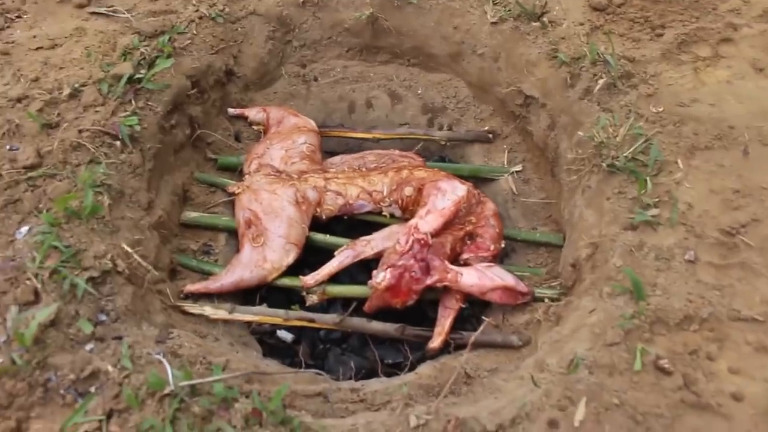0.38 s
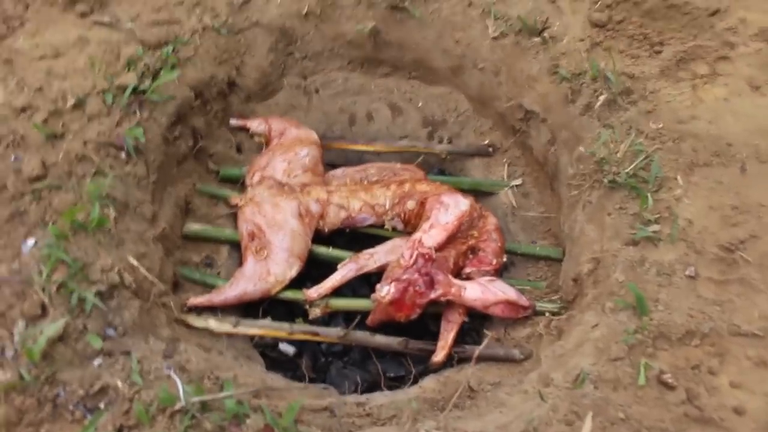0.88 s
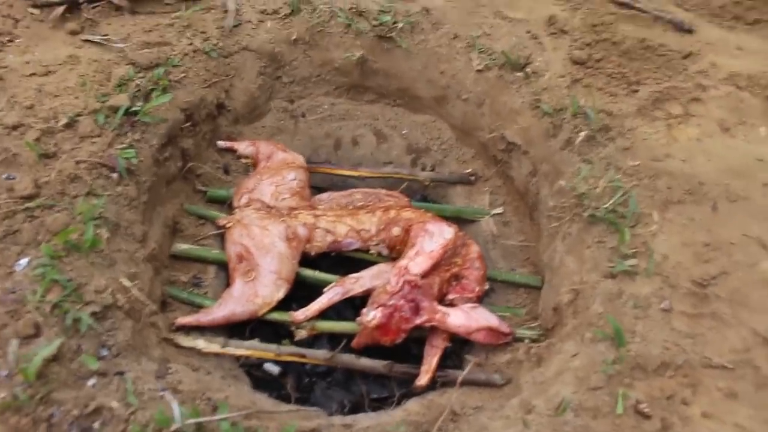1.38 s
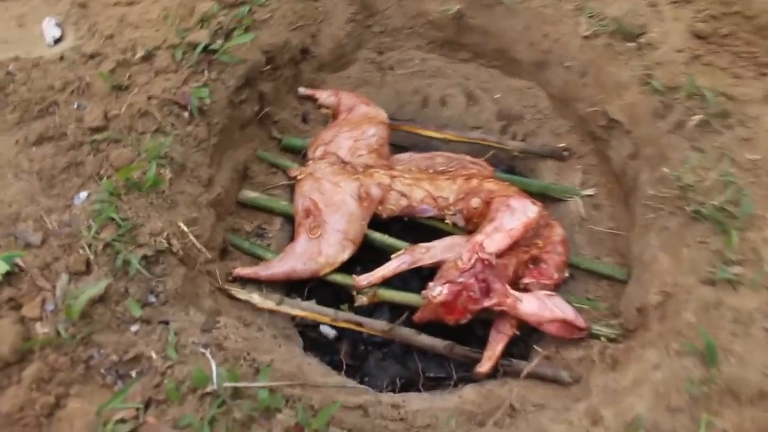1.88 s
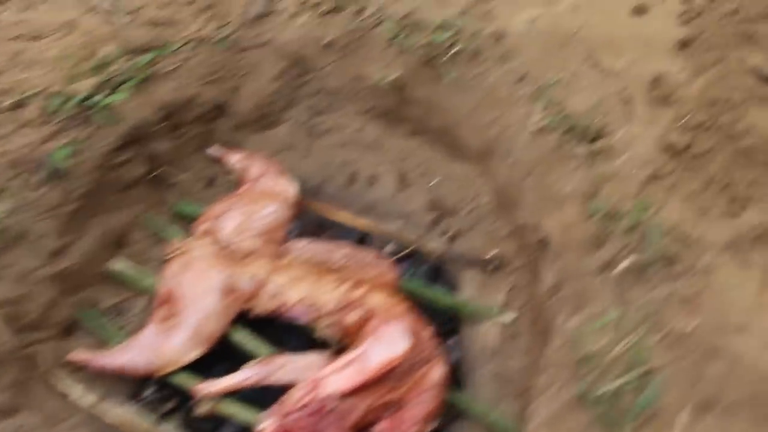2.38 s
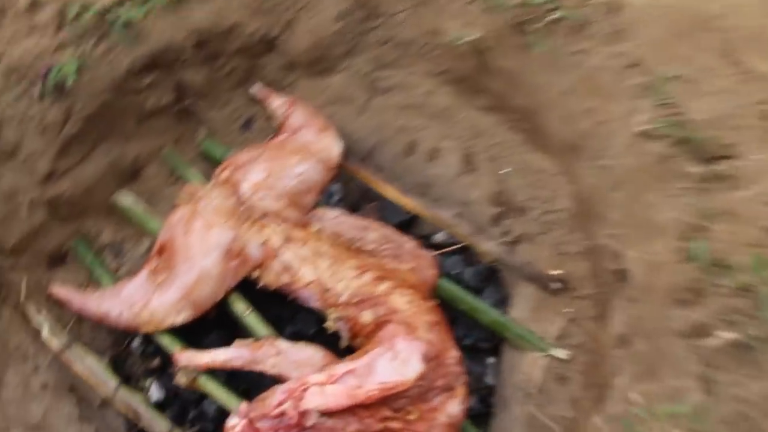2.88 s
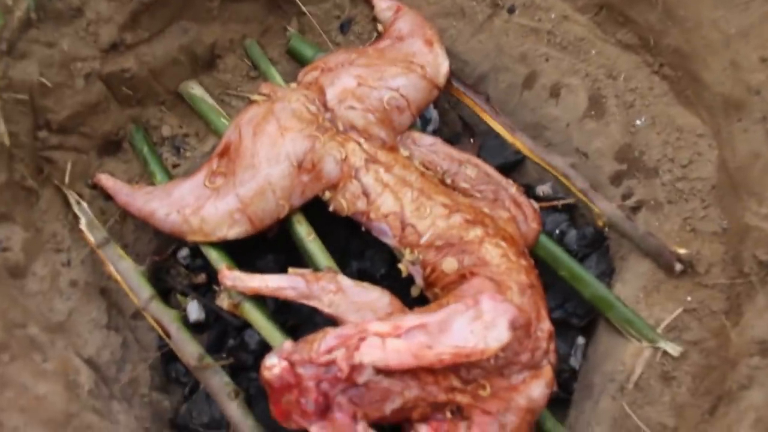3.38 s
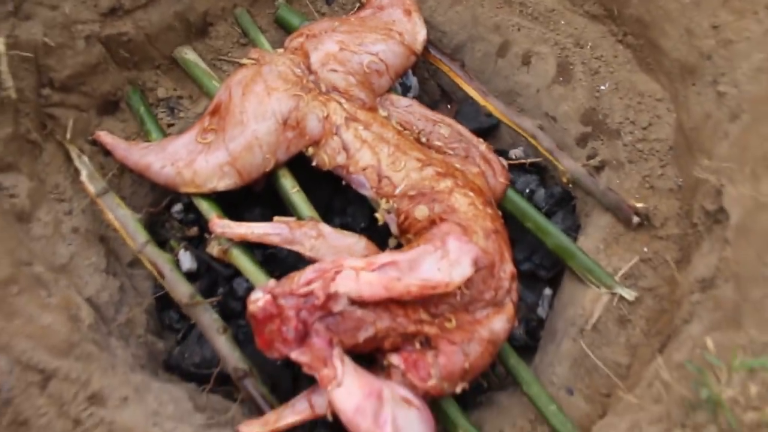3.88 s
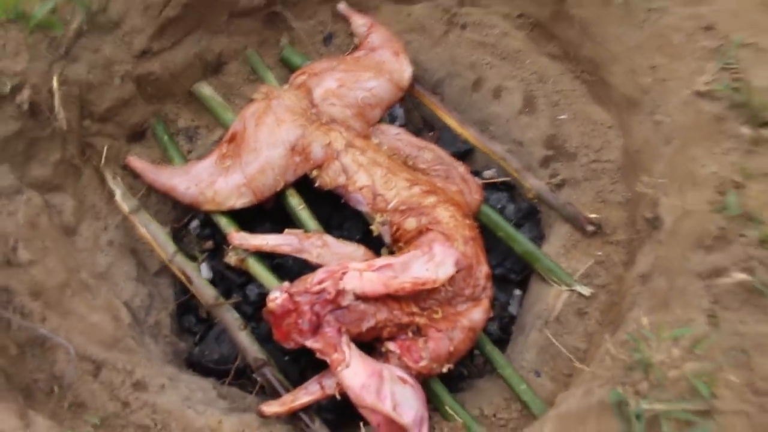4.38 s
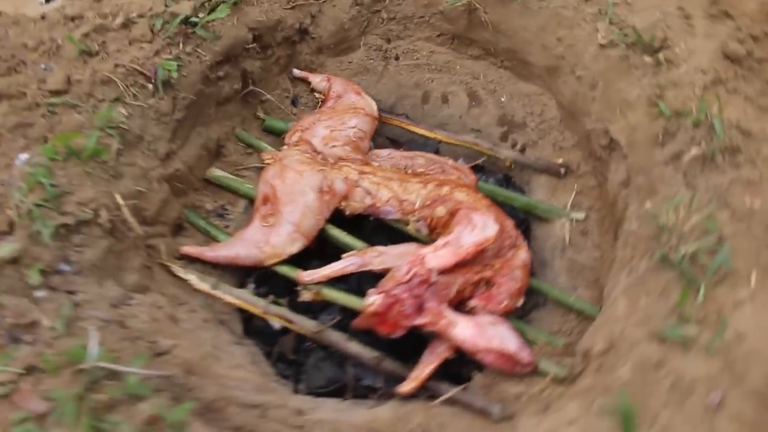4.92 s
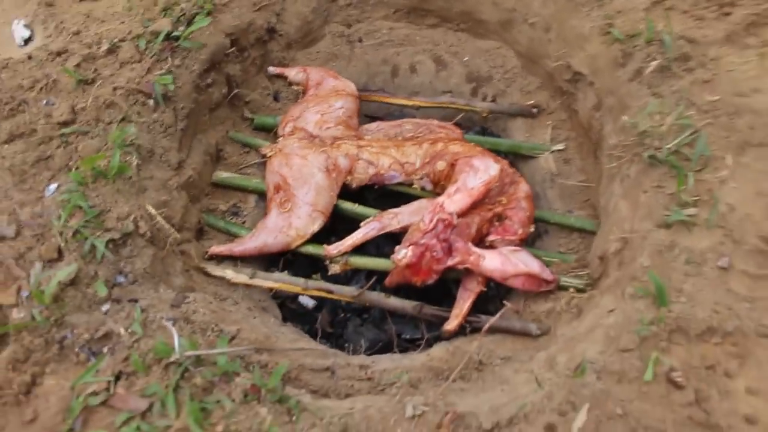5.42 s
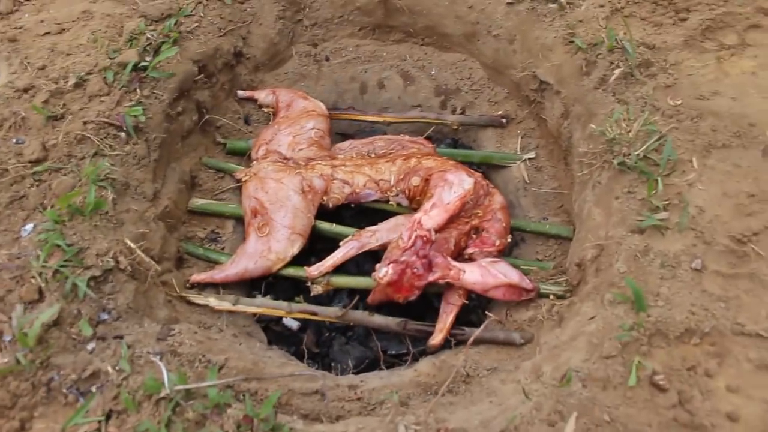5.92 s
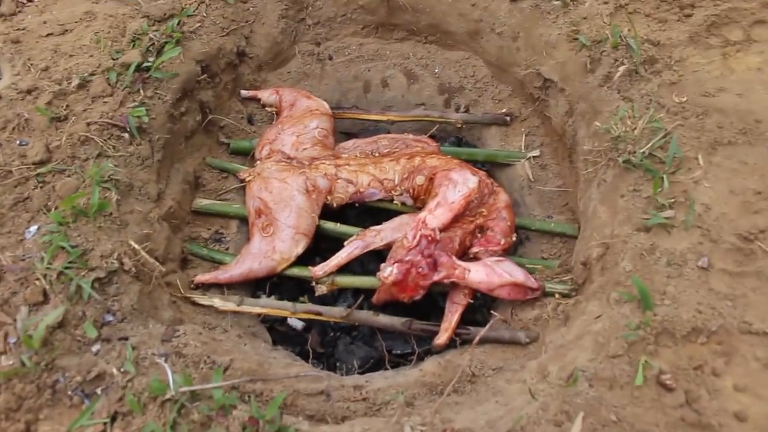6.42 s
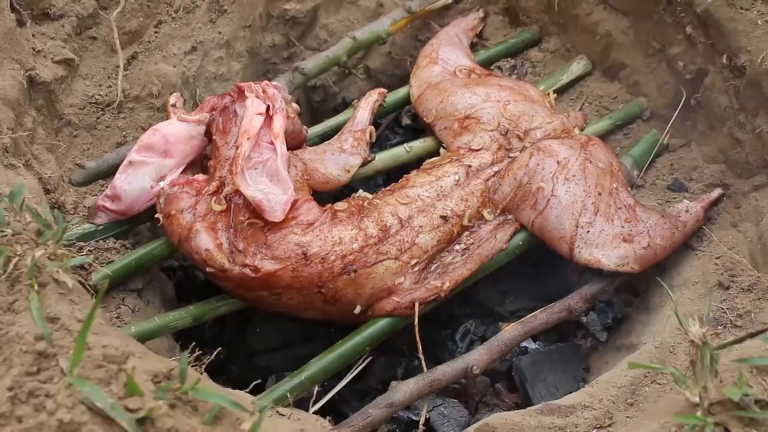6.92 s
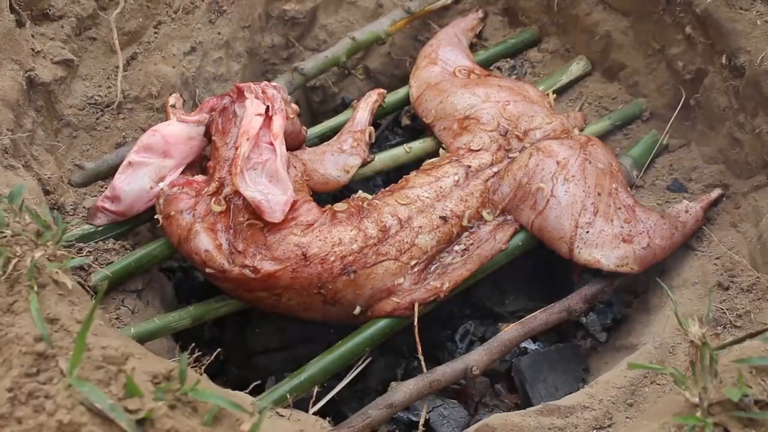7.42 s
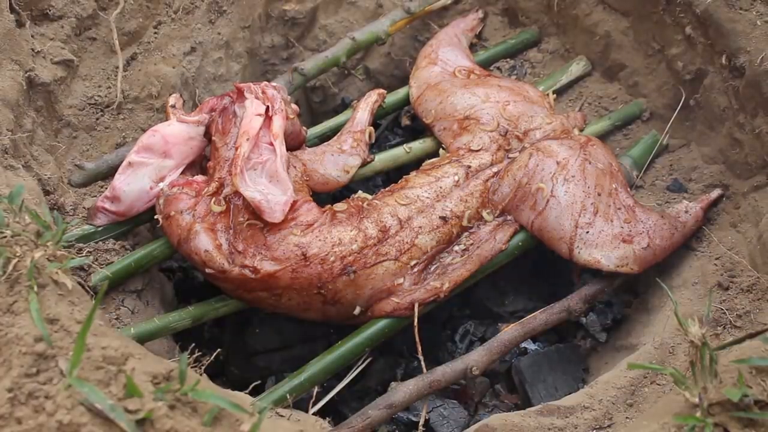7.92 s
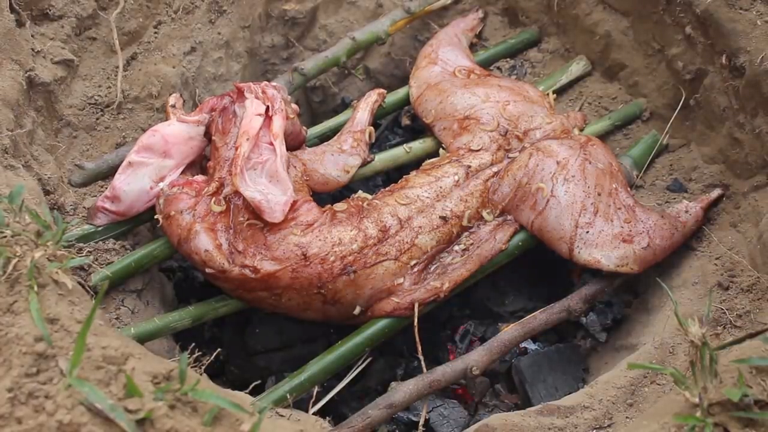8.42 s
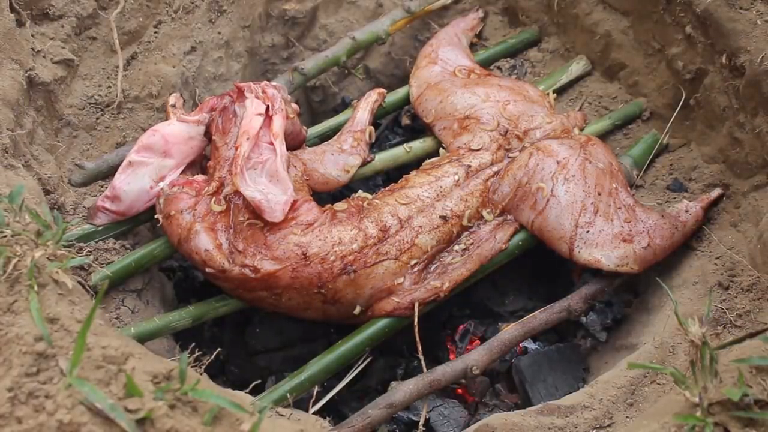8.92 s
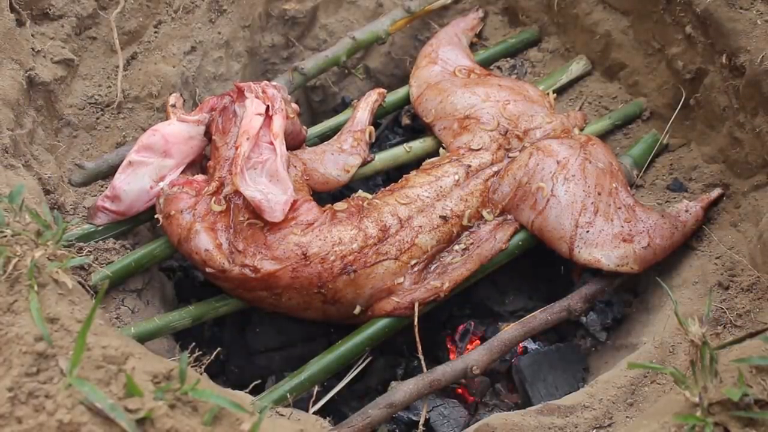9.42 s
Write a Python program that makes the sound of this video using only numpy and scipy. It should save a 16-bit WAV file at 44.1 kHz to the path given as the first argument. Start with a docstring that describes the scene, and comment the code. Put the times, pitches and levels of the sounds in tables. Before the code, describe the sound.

Outdoors by a cooking pit in soil, a soft forest hiss and high throbbing cricket drone continue, with nearby cricket trills and small falling bird chirps. Feet slide on sand, twigs and embers tick lightly. Around seven seconds a twig cracks sharply with a close scuff, a gritty drag follows, bird calls become livelier, and a draught makes the fire flutter low. Wide stereo pair near the ground.

```python
"""Forest hiss, far rumble and a throbbing cricket chorus surround a cooking pit; all are filtered noise.
Birds and soft low animal calls are falling sine whistles with scattered echoes; near crickets trill in wing strokes.
Feet rub sandy soil as clumped noise; embers and twigs tick and soil bumps ring as decaying resonances.
One twig cracks under a close scuff, and at the end a draught makes the fire roar.
Level and delay differences between the two channels act as a pair of spaced microphones."""
import sys
import numpy as np
from scipy import signal
from scipy.fft import rfft, irfft, next_fast_len
from scipy.io import wavfile
from scipy.ndimage import map_coordinates

SR = 44100
rng = np.random.default_rng(int(sys.argv[2]) if len(sys.argv) > 2 else 0)


def attenuation_scalar(level_db):
    """Turn a level in dB into a linear amplitude multiplier (20 dB per decade)."""
    decades = np.asarray(level_db, float) / 20
    return 10 ** decades


def pcm_store(signal):
    """Save signal as 16-bit PCM."""
    levels = np.round(np.clip(np.atleast_2d(signal), -1, 1) * 32767)
    wavfile.write(sys.argv[1], SR, levels.astype(np.int16).T)


N = 421155

# Relative spectrum of fine grains under a close sole: frequency_hz, level_db
FINE_SAND = [(3240, -16), (5500, -14), (8040, -11.5), (11900, -20), (14900, -28), (15800, -52)]


def unit(x):
    """Normalisation: divides a signal by its root-mean-square value."""
    return x / np.sqrt(np.mean(x ** 2) + 1e-20)


def along(points, hz):
    """Logarithmic frequency scale: interpolates rows of frequency and value."""
    f, v = np.transpose(points)
    return np.interp(np.log(hz + 1), np.log(f + 1), v)


def curves(rows):
    """Linear envelopes: one value per sample for each column after the time."""
    s, *cols = np.transpose(rows)
    return [np.interp(np.arange(N) / SR, s, c) for c in cols]


def wobble(rate):
    """Band-limited random modulation: a smooth curve through rate random knots a second."""
    knots = rng.standard_normal(int(N * rate / SR) + 4)
    return map_coordinates(knots, [np.arange(N) * rate / SR])


def filtered(x, response):
    """Linear filtering: multiplies the spectrum by a complex response of frequency."""
    m = next_fast_len(N + 8192)
    return irfft(rfft(x, m) * response(np.fft.rfftfreq(m, 1 / SR)), m)[..., :N]


def hiss():
    """White noise: two independent channels with equal power at all frequencies."""
    return rng.standard_normal((2, N))


def pair(noise, spectrum, alike, lag_ms):
    """Interchannel coherence: colours two noises to correlation alike, left one late, overall rms 1."""
    turn = np.arccos(np.clip(alike, -1, 1)) / 2
    common, opposed = np.cos(turn) * noise[0], np.sin(turn) * noise[1]
    lag_s = lag_ms / 1000 * np.array([[1], [0]])

    def response(hz):
        return attenuation_scalar(along(spectrum, hz)) * np.exp(-2j * np.pi * hz * lag_s)

    return unit(filtered(np.array([common + opposed, common - opposed]), response))


def sides(pan_db):
    """Interchannel level difference: left and right gains, positive toward the left."""
    half_db = np.atleast_1d(pan_db) / 2
    return attenuation_scalar(np.array([half_db, -half_db]))


def rumble():
    """Low-frequency noise: a slowly wavering rumble from afar."""
    # Relative spectrum of the rumble: frequency_hz, level_db
    rumble_spectrum = [(15, -46), (25, -41), (43, -1), (91, 1.5), (140, -4.5), (173, -19), (200, -10),
                       (260, -45), (440, -120)]
    level = attenuation_scalar(-58.5 + 1.6 * wobble(2.52) + 1.06 * wobble(6))
    return level * pair(hiss(), rumble_spectrum, alike=0.82, lag_ms=0) * sides(4)


def flames():
    """Amplitude-modulated noise: flames flutter, and the draught sets their level."""
    # Fire and wind level before a fixed gain: time_s, level_db
    draught = [(0, -67), (1.1, -57), (1.65, -61), (2.3, -56.5), (3.3, -64), (4.52, -60.5), (4.9, -62),
               (6.6, -65), (7.15, -53.5), (7.85, -58.5), (8.1, -50), (8.5, -40.5), (9.0, -41.5),
               (9.55, -38)]
    # Relative spectrum of the flames: frequency_hz, level_db
    flame_spectrum = [(35, -35), (60, -9.5), (112, -4.5), (226, -1), (287, -0.5), (466, -16), (686, -15),
                      (900, -23.5), (1170, -23), (1980, -120)]
    level_db, = curves(draught)
    flutter = attenuation_scalar(2.25 * wobble(25))
    flame = unit(flutter * pair(hiss(), flame_spectrum, alike=0.88, lag_ms=0.055))
    return flame * attenuation_scalar(level_db - 3.17) * sides(2.5)


def forest_hiss():
    """Diffuse field: the forest hiss is nearly uncorrelated between the channels."""
    # Relative spectrum of the forest hiss: frequency_hz, level_db
    hiss_spectrum = [(88, -33), (150, 0), (244, -9.5), (455, -6), (727, -11), (1280, -12.5), (2790, -14.5),
                     (3740, -11.5), (4280, -6), (5410, -16.5), (13300, -29.5), (15800, -33.5)]
    level = attenuation_scalar(-52.0 + 0.29 * wobble(2.93))
    return level * pair(hiss(), hiss_spectrum, alike=0.083, lag_ms=0.212)


def chorus():
    """Incoherent summation: many far crickets blur into a narrow throbbing noise band."""
    # Level of the far crickets before the second image is added: time_s, level_db
    chorus_levels = [(0, -59), (.42, -58), (.6, -62), (1.15, -69), (1.35, -56), (1.75, -56.5), (2.1, -72),
                     (2.93, -60), (3.2, -68), (4.41, -57), (4.75, -73), (5.4, -55), (5.9, -67),
                     (6.57, -53.5), (6.9, -59.5), (7.7, -55), (8.75, -61.5), (9.3, -58.5)]
    level_db, = curves(chorus_levels)
    centre_hz, width_hz = 4536, 125

    def narrow(hz):
        return 1 / (1 + (hz / width_hz) ** 2)

    slow = filtered(hiss(), narrow) + 1j * filtered(hiss(), narrow)
    carrier = np.exp(2j * np.pi * centre_hz * np.arange(N) / SR)
    throb = attenuation_scalar(3.1 * wobble(18) + 1.3 * wobble(60))
    band = unit(throb * (slow * carrier).real)
    crossed = np.roll(band[::-1], 10, axis=1)  # channels swapped, 10 samples late
    return attenuation_scalar(level_db) * (band + 0.3 * crossed)


def grains(clump_db, spike_db):
    """Granular friction: sand grains crunch in clumps; a few are larger."""
    sizes = np.minimum(rng.exponential(size=N), 5)
    return attenuation_scalar(clump_db * (wobble(40) + wobble(300)) + spike_db * sizes) * hiss()


def scrape(level, treble_db, pan_db, spectrum, bright, sand, alike):
    """Sliding friction: a sole rubs the soil, stirring coarse grit and fine bright sand."""
    grit = pair(sand, spectrum, alike, lag_ms=0.04)
    fine = pair(sand, bright, .5 * alike, lag_ms=0.021)
    return level * attenuation_scalar(1.5) * sides(pan_db) * (grit + attenuation_scalar(treble_db - 0.5) * fine)


def slides():
    """Energy addition: steps and stirring sum in power; the louder one sets treble and side."""
    # Small stirring near the microphones, before fixed gains: time_s, level_db, treble_db
    stirring = [(0, -60.5, -18), (1.7, -60, -11), (2.6, -56.5, -7), (3.15, -63, -5), (4.3, -65, 0),
                (5.5, -59, -12), (6.93, -66, -22), (7.1, -59.5, -7), (9.55, -58, 1)]
    # Feet sliding some steps away, level at the end of the slide before fixed gains:
    # start_s, length_s, level_db, treble_db, left_right_db
    sliding_feet = [(0.454, 0.25, -58.5, -22, 2), (0.704, 0.073, -46, -23, 1.5), (0.952, 0.22, -56, -20, 3),
                    (1.168, .13, -47.5, -27, 2.5), (2.05, 0.42, -58.5, -11, 4), (4.313, 0.14, -56, -2.5, 7),
                    (4.443, 0.097, -50, -2.5, 7.5), (5.056, 0.094, -49.5, -16, 3.5),
                    (7.918, 0.26, -54.5, -3.5, 4), (8.952, 0.19, -55.5, 1.5, -2)]
    land_s, lift_s, press_db = 0.035, 0.043, 0.5
    stir_pan_db = 3
    t = np.arange(N) / SR
    db, treble_db = curves(stirring)
    power = attenuation_scalar(db) ** 2
    treble, pan = power * treble_db, power * stir_pan_db
    for s, length, db, treble_db, pan_db in sliding_feet:
        # the sole settles, presses harder along the slide, then lifts
        landing, lifting = (t - s) / land_s, (s + length + lift_s - t) / lift_s
        touch = np.clip(np.minimum(landing, lifting), 0, 1)
        effort_db = db - press_db * np.clip(1 - (t - s) / length, 0, 1)
        step = (touch * attenuation_scalar(effort_db)) ** 2
        power, treble, pan = power + step, treble + step * treble_db, pan + step * pan_db
    return np.sqrt(power), treble / power, pan / power


def footsteps():
    """Sliding friction: steps some way off and small stirring rub loose sand."""
    # Relative spectrum of the coarse sand: frequency_hz, level_db
    sand_spectrum = [(250, -27), (500, -6.5), (850, -2), (1400, -1.5), (2100, -4.5), (2800, -11.5),
                     (4500, -18), (8000, -28), (15000, -84)]
    # Relative spectrum of the bright dust: frequency_hz, level_db
    dust_spectrum = [(1200, -49), (2200, -7.5), (3500, -2), (5500, -6), (8000, -11.5), (12000, -16.5),
                     (15800, -28)]
    return scrape(*slides(), sand_spectrum, dust_spectrum, grains(1.4, 2.3), alike=0.19)


def trees(x):
    """Reverberation: echoes among the trunks, each frequency dying at its own speed."""
    # Decay among the trunks: frequency_hz, t60_s
    tree_decay = [(400, 0.17), (5000, 0.39), (9000, 0.12)]
    hz, t, z = signal.stft(rng.standard_normal((2, SR // 3)), SR, nperseg=256)
    decay = attenuation_scalar(-60 * t / along(tree_decay, hz)[:, None])
    tail = signal.istft(z * decay, SR, nperseg=256)[1]
    return signal.fftconvolve(x[None], tail / np.linalg.norm(tail[0]), axes=1)[:, :N]


def whistles(table, rough, count, spread, throb_db, flutter_rate, skew):
    """Multipath scattering: falling whistles, quick at first, are split into strands by near boughs."""
    near, far = np.zeros((2, N + SR)), np.zeros(N + SR)
    flutter = wobble(flutter_rate)
    first_plain = np.minimum(np.arange(count), 1)[:, None]  # the first strand is left unaltered
    all_draws = rng.uniform(-1, 1, (len(table), count, 4))
    for (s, length, from_hz, to_hz, db), draws in zip(table, all_draws):
        u = np.arange(int(length * SR)) / (length * SR)
        # share of power sent by way of the trees: it grows for calls above -53.5 dB
        lost = np.clip(.33 + .13 * (db + 53.5), .33, .985)
        glide_hz = to_hz + (from_hz - to_hz) * (1 - u) ** 1.6
        envelope = np.sin(np.pi * u ** skew) ** 0.39
        flutter_depth = rough * to_hz / flutter_rate * np.sqrt(lost)
        for late, bend, size, side in draws * first_plain:
            hz = glide_hz * (1 - spread * lost * abs(bend) * (1 - u))
            at = int((s + 0.44 * lost * length * abs(late)) * SR)
            phase = 2 * np.pi * np.cumsum(hz) / SR + flutter_depth * flutter[at // 2:][:len(u)]
            note = attenuation_scalar(db + 5.9 * size) * envelope * np.sin(phase)
            near[:, at:][:, :len(u)] += np.sqrt(1 - lost) * note * sides(5 * side)
            far[at:][:len(u)] += np.sqrt(lost) * note
    throb = attenuation_scalar(throb_db * wobble(50))
    return throb * near[:, :N] + trees(throb * far[:N])


def flock(count):
    """Random point process: fainter chirps at independent, uniformly drawn moments."""
    draws = rng.uniform(size=(count, 4))
    return [(s * (N / SR - .3), 0.065 + 0.08 * n, 5600 + 1400 * hz, 4900, -69 + 4 * db)
            for s, n, hz, db in draws]


def birds():
    """Frequency modulation: small birds drop falling chirps among the trees."""
    # Bird chirps, nominal values before strands vary them: start_s, length_s, from_hz, to_hz, level_db
    bird_chirps = [(.24, .054, 5840, 4800, -64), (.40, .068, 5880, 4490, -59),
                   (.55, 0.086, 6400, 5200, -60.5), (.99, .045, 6500, 4670, -57),
                   (1.22, 0.12, 7140, 5540, -64), (1.46, .11, 6400, 4980, -62),
                   (2.15, .12, 6970, 4980, -63), (2.79, .12, 6800, 4980, -62),
                   (3.8, .049, 6970, 4870, -60.5), (4.93, 0.16, 7000, 4800, -60.5),
                   (5.4, 0.092, 6070, 4970, -58.5), (5.6, 0.1, 6850, 4860, -60.5),
                   (5.94, 0.1, 7240, 4700, -56), (6.14, 0.052, 7100, 5400, -63),
                   (6.38, .07, 6000, 5000, -68), (6.67, .12, 6840, 4970, -61),
                   (7.1, 0.2, 6600, 4940, -57.5), (7.19, .17, 5340, 3650, -53),
                   (7.44, .13, 6950, 4400, -49.5), (7.49, .08, 6300, 4800, -51),
                   (7.8, 0.1, 6020, 3850, -49.5), (7.93, 0.069, 7170, 4320, -51.5),
                   (8.06, 0.079, 6680, 4260, -53.5), (8.19, 0.13, 5620, 4680, -57.5),
                   (9.04, 0.15, 4780, 4110, -55), (9.4, .16, 5850, 4780, -56)]
    return whistles(bird_chirps + flock(count=40), rough=0.15, count=4, spread=.3, throb_db=1.5,
                    flutter_rate=400, skew=0.29)


def animal_calls():
    """Frequency modulation: soft low animal calls glide downward with a rough phase."""
    # Animal calls, nominal values before strands vary them: start_s, length_s, from_hz, to_hz, level_db
    low_calls = [(.35, .15, 1102, 1086, -63), (1.72, .2, 463, 427, -60.5), (4.48, 0.17, 450.5, 416, -57),
                 (7.09, .27, 1510, 1407, -54), (9.445, 0.1206, 539, 383, -48)]
    return whistles(low_calls, rough=.36, count=2, spread=.08, throb_db=4, flutter_rate=220, skew=.9)


def cricket():
    """Stridulation: each chirp is two wing strokes on one ringing pitch, with a weak third harmonic."""
    # Near trills, level before effort and gain: first_chirp_s, end_s, level_db, start_pitch_hz, end_pitch_hz
    near_trills = [(.411, 1.146, -58, 4240, 4290), (1.949, 2.926, -57.5, 4240, 4200),
                   (5.621, 6.93, -57, 4167, 4300)]
    period_s = .0571
    swell_s, swell_db, tire_db_per_s = 0.3, 7, 1.5  # a trill starts soft, then slowly tires
    t = np.arange(N) / SR
    times = [row[k] for row in near_trills for k in (0, 1)]
    pitches = [row[k] for row in near_trills for k in (3, 4)]
    hz = np.interp(t, times, pitches)
    strokes = np.zeros(N)
    for start, end, db, *_ in near_trills:
        u, age = (t - start) % period_s, np.clip(t - start, 0, end - start)
        both = np.exp(-((u - .006) / 0.0045) ** 2) + 1.09 * np.exp(-((u - .021) / 0.0043) ** 2)
        effort_db = db - swell_db * np.clip(1 - age / swell_s, 0, 1) - tire_db_per_s * age
        strokes += both * attenuation_scalar(effort_db) * (t >= start) * np.clip((end - t) / 0.011, 0, 1)
    phase = 2 * np.pi * np.cumsum(hz) / SR + .5 * wobble(150)
    tone = np.sin(phase) + attenuation_scalar(-29) * np.sin(3 * phase)
    song = strokes * attenuation_scalar(13.5 + 1.2 * wobble(120)) * tone
    direct = np.array([np.roll(song, 10), song])  # left channel 10 samples late
    return direct * sides(2) + attenuation_scalar(-18) * trees(song)


def ticks():
    """Modal decay: snapped wood rings briefly, splinters rattle near that pitch, a bright click rides on top."""
    # Twigs knock and snap, levels before fixed gains: start_s, level_db, ring_hz, treble_db, left_right_db
    twig_snaps = [(.785, -41, 1970, 8, -2), (1.076, -36.5, 2830, -25, 8), (1.144, -28, 1630, -26, 3),
                  (1.324, -34, 1020, -25, 2), (2.02, -40.5, 870, -25, 3), (2.396, -38, 1110, -26, 0),
                  (2.615, -36.5, 2720, -8, 13), (2.824, -38.5, 3370, -27, 4), (2.929, -42, 1500, -20, 7),
                  (3.051, -32.5, 1030, -30, 1), (3.981, -34.5, 1074, -30, -4), (4.89, -38.5, 1630, -3, 5),
                  (5.375, -33, 3700, -15, 6), (5.384, -28.5, 3120, -19, 7), (5.392, -38.5, 1530, -1, 13),
                  (6.297, -33.5, 984, -30, 1), (6.993, -13.5, 1860, -32, -3), (8.813, -33.5, 1660, -20, -2),
                  (9.04, -40, 1900, -20, -2), (9.105, -29.5, 2030, -2, -3)]
    # Embers tick, level before a fixed gain: start_s, level_db, ring_hz
    ember_ticks = [(1.87, -46, 6000), (2.107, -30, 6650), (2.626, -36, 5940), (3.139, -45, 9000),
                   (3.661, -39.5, 8950), (5.819, -47, 7800), (6.125, -46, 7000), (6.53, -51, 8000),
                   (7.212, -39, 9000), (8.255, -39, 6760), (8.99, -46, 7500), (9.016, -37.5, 5470),
                   (9.086, -37, 5500)]
    ember_treble_db, ember_pan_db = -14, -1.5
    out, t = np.zeros((2, N + SR)), np.arange(SR // 20) / SR
    f = np.fft.rfftfreq(len(t), 1 / SR)
    bright = 1j * f / (7000 + 1j * f) * 1j * f / (5000 + 1j * f) / (1 + 1j * f / 9000) ** 2
    hits = twig_snaps + [(*row, ember_treble_db, ember_pan_db) for row in ember_ticks]
    noises = rng.standard_normal((len(hits), 2, len(t)))
    for (s, db, hz, treble_db, pan_db), noise in zip(hits, noises):
        t60 = .004 + 15 / hz  # seconds: a fixed part plus 15 ring cycles
        splinters = attenuation_scalar(-60 * t / t60) * (1 - np.exp(-t / 0.00045)) * noise
        upper = 0.42 * np.sin(2 * np.pi * 1.822 * hz * t) * hz * t  # the upper mode blooms late
        hollow = np.sin(2 * np.pi * hz * t) + upper
        ring = attenuation_scalar(-6.5 * hz * t) * (1 - np.exp(-6 * hz * t)) * hollow
        wood = 1j * f * 1.86 * hz / (1.15 * hz * hz - f * f + 1j * f * 1.33 * hz)
        colour = 1.15 * wood * wood * wood + attenuation_scalar(treble_db + 7) * bright
        rattle = irfft(rfft(splinters) * colour, len(t))
        at = round((s + .0005) * SR)
        out[:, at:][:, :len(t)] += attenuation_scalar(db + 3.0) * sides(pan_db) * (1.12 * ring + rattle)
    return out[:, :N] + attenuation_scalar(-9.5) * trees(out[:, :N].mean(0))


def bumps():
    """Damped oscillation: a soft push rings the soil briefly."""
    # Dull bumps on the ground, level before fixed gains: start_s, level_db, ring_hz
    ground_bumps = [(1.084, -33, 293), (2.013, -31, 149), (2.094, -37, 172), (2.148, -32.5, 593),
                    (4.385, -24.5, 380), (7.484, -33.5, 386), (7.519, -31, 630)]
    t60_s, attack_s = 0.013, 0.0011
    out, t = np.zeros(N + SR), np.arange(SR // 10) / SR
    for s, db, hz in ground_bumps:
        envelope = attenuation_scalar(db + 6 - 60 * t / t60_s) * (1 - np.exp(-t / attack_s))
        out[round(s * SR):][:len(t)] += envelope * np.sin(2 * np.pi * hz * t)
    return out[:N] * sides(3)


def during(rows):
    """Time gating: 1 from the first row to the last, else 0."""
    t = np.arange(N) / SR
    return (t >= rows[0][0]) & (t <= rows[-1][0])


def stroke(rows):
    """Envelope control: level, treble and side of one stroke."""
    db, treble_db, pan_db = curves(rows)
    return during(rows) * attenuation_scalar(db), treble_db, pan_db


def scuff():
    """Sliding friction: a close sole scuffs briefly, its two channels partly in antiphase."""
    # Close scuff, levels before fixed gains: time_s, level_db, treble_db, left_right_db
    scuff_path = [(6.934, -45, -14, -4), (6.945, -36, -18, -5), (6.97, -32.5, -20, -1), (7, -35, -21, -9),
                  (7.02, -36, -15, -8.5), (7.045, -35.5, -13, -12.5), (7.065, -29.5, -10, -4),
                  (7.078, -32.5, -3, -7), (7.092, -44, -22, -1)]
    # Relative spectrum of the sole on soil: frequency_hz, level_db
    sole_spectrum = [(88, -37), (150, -10), (362, -15), (558, -7), (729, -7), (875, -5), (1350, -6.5),
                     (1520, -9.5), (3100, -12), (3910, -23), (4940, -11.5), (8000, -34), (10400, -49),
                     (17600, -120)]
    return scrape(*stroke(scuff_path), sole_spectrum, FINE_SAND, grains(2.4, 1.1), alike=-0.42)


def drag():
    """Sliding friction: a long drag over grit, its channels strongly correlated."""
    # Long drag, levels before fixed gains: time_s, level_db, treble_db, left_right_db
    drag_path = [(7.094, -57.5, -9, -1), (7.3, -48.5, -12, 2), (7.42, -50.5, -9, 2.5), (7.5, -46, -3, 4),
                 (7.83, -42.5, -6, 4.5), (7.9, -54, -8, 3)]
    # Relative spectrum of the coarse grit: frequency_hz, level_db
    grit_spectrum = [(150, -42), (250, -18), (449, -2.5), (523, -4), (865, 0.5), (1070, -1.5), (1640, -3.5),
                     (5010, -4.5), (7000, -12), (9100, -64), (15400, -120)]
    return scrape(*stroke(drag_path), grit_spectrum, FINE_SAND, grains(0.62, 3.1), alike=0.9)


def scene():
    """Superposition: the pressures of all sources add."""
    background = rumble() + flames() + forest_hiss() + chorus()
    animals = birds() + animal_calls() + cricket()
    feet = footsteps() + scuff() + drag()
    return background + animals + feet + ticks() + bumps()


def band_limit(x):
    """A steep low-pass at the top of the band."""
    return signal.sosfilt(signal.butter(12, 16650, fs=SR, output="sos"), x)


def record(dry):
    """Band limitation: an ideal low-pass filter passes only frequencies below 15830 Hz."""
    mix = filtered(dry, lambda hz: hz < 15830)
    return band_limit(mix)


dry = scene()
out = record(dry)
pcm_store(out)
```